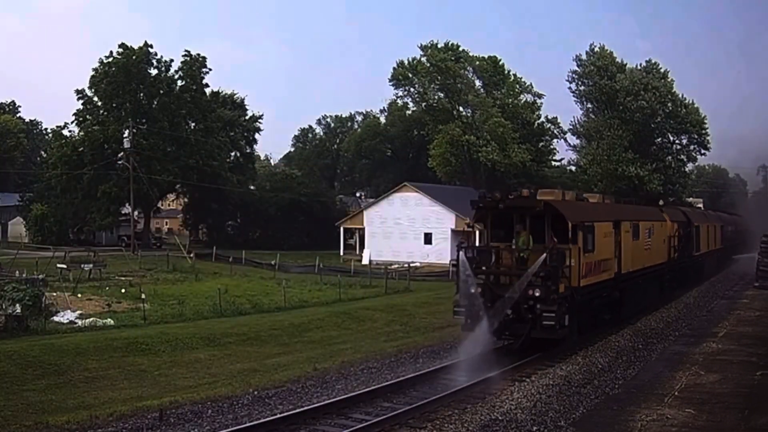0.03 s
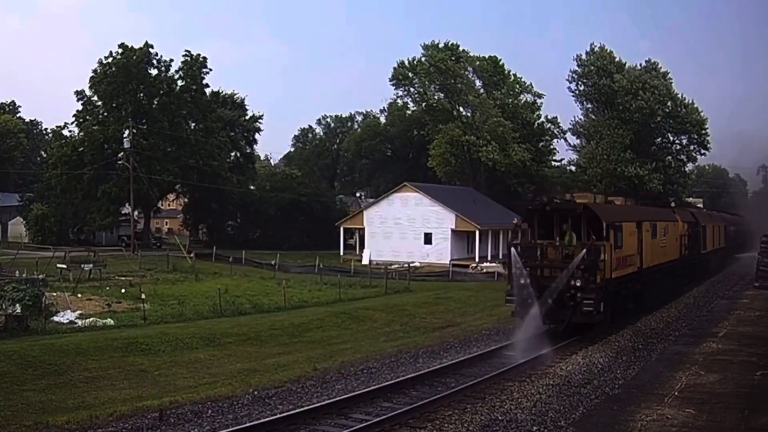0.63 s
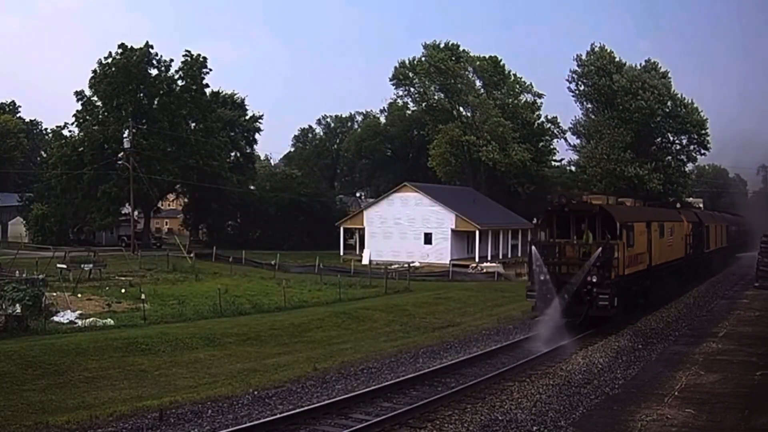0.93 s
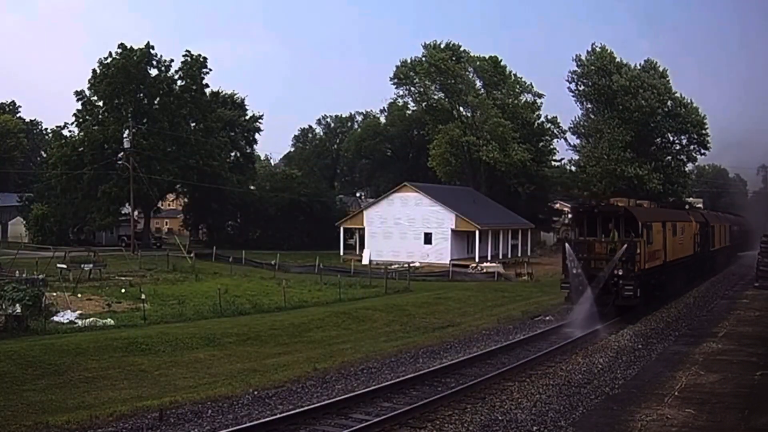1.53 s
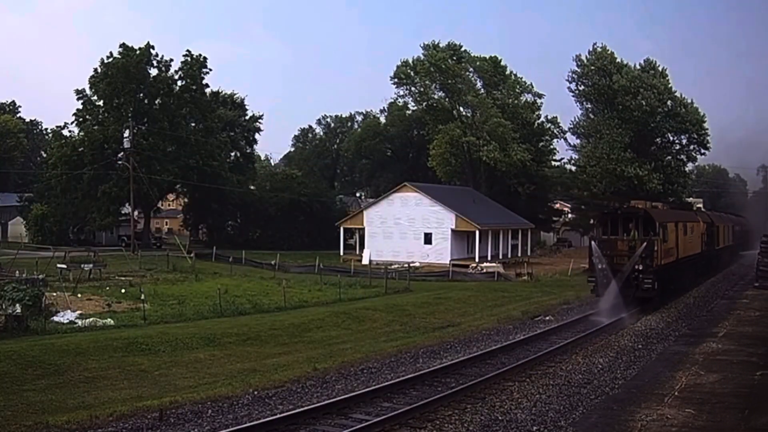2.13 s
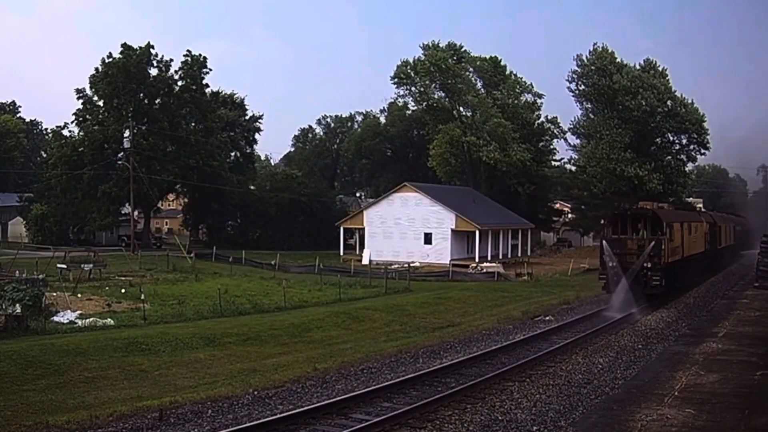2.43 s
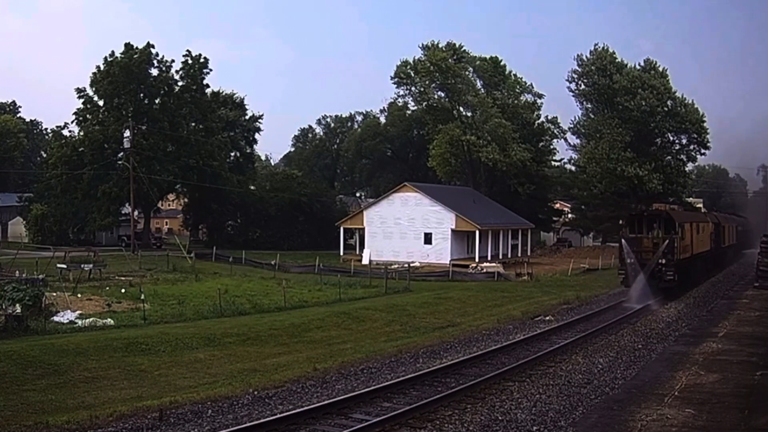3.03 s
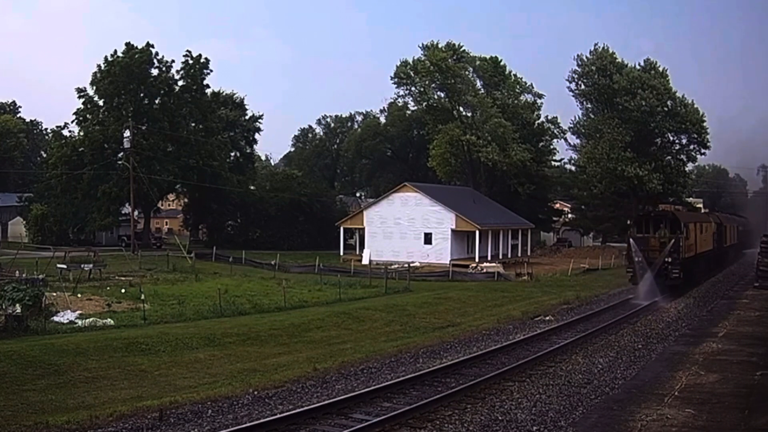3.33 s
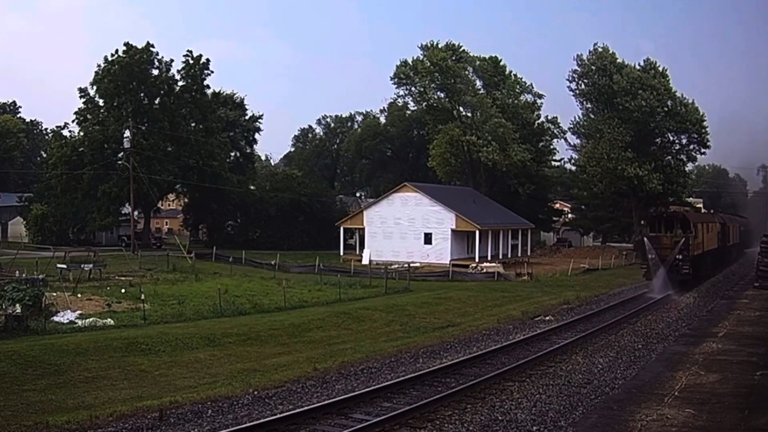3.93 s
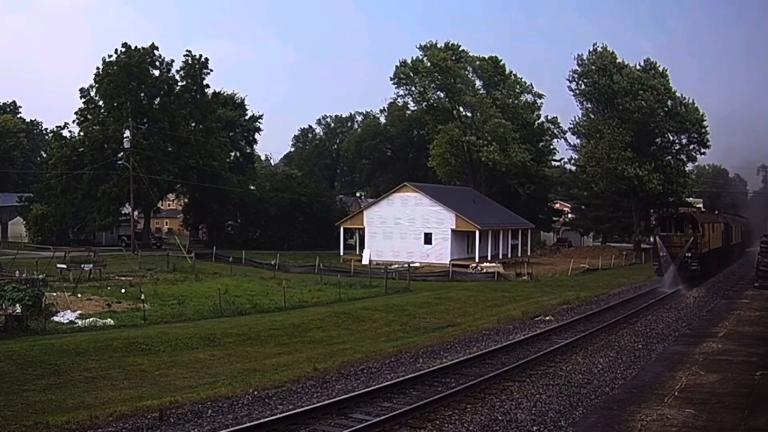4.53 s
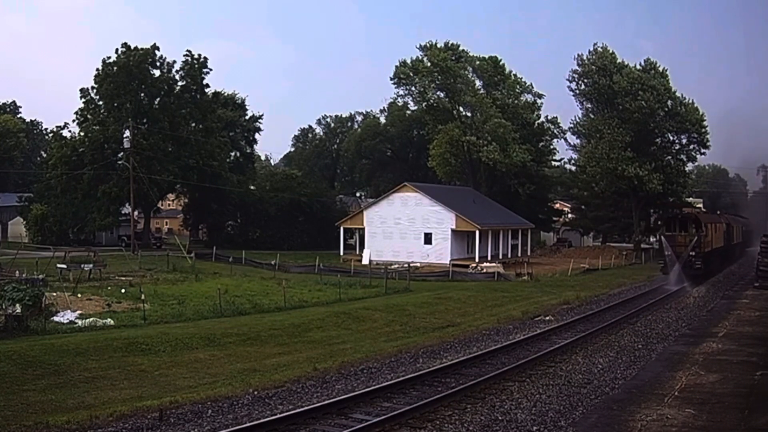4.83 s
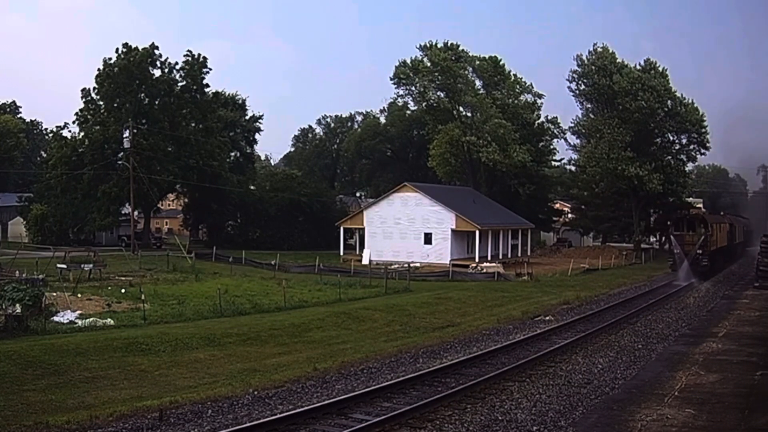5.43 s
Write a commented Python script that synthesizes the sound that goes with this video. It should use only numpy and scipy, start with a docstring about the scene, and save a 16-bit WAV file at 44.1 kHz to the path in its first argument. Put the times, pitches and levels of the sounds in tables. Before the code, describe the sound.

A rail grinding train moves away, its diesel engines droning under a machinery roar, with rasping stones and howling steel.

```python
"""A rail grinding train rolls away

Two diesel engines drone and throb under the roar of fans, motors and wheels.
Grinding stones rasp on the rail and make the steel sing and howl, while water jets hiss.
An echo off the ground adds a sweep that climbs as the train leaves; light wind nudges the microphone."""
import sys
import numpy as np
from scipy import signal
from scipy.fft import rfft, irfft
from scipy.io import wavfile
from scipy.ndimage import uniform_filter1d

SR = 44100
rng = np.random.default_rng(int(sys.argv[2]) if len(sys.argv) > 2 else 0)


def master(y):
    """Save y as 16-bit WAV."""
    cut = np.clip(np.atleast_2d(y).T, -1, 1)
    pcm = np.round(cut * 32767)  # scale
    wavfile.write(sys.argv[1], SR, pcm.astype(np.int16))


N = 250929
T = np.arange(N) / SR
HZ = np.fft.rfftfreq(N, 1 / SR)


def gain_of(db):
    """Turns decibels into a number to multiply a sound by."""
    return 10 ** (np.asarray(db) / 20)


def unit_level(x):
    """Scales a signal to an average (rms) level of 1."""
    return x / np.sqrt(np.mean(x ** 2) + 1e-20)


def curve(rows):
    """Joins (seconds, value) points with straight lines."""
    return np.interp(T, *np.transpose(rows))


def spectrum(points):
    """Joins (Hz, dB) points into a level for every frequency."""
    hz, db = np.transpose(points)
    return np.interp(np.log(HZ + 1), np.log(hz + 1), db)


def noise(shape_db):
    """Noise of level 1 with the given balance of low and high frequencies."""
    return unit_level(irfft(rfft(rng.standard_normal(N)) * gain_of(shape_db), N))


def wander(rate):
    """A random wobble of level 1 that changes up to about rate times a second."""
    times = np.linspace(0, N / SR, 2048)
    hz = np.fft.rfftfreq(len(times), times[1])
    slow = irfft(rfft(rng.standard_normal(len(times))) / (1 + (hz / rate) ** 4))
    return unit_level(np.interp(T, times, slow))


def distance(start_m=25.4, speed_m_per_s=3.5):
    """How many times farther away the train is than at the start."""
    return 1 + speed_m_per_s * T / start_m


def receding(db, falloff):
    """Turns a level in dB into a gain that drops with distance; a bigger falloff drops faster."""
    return gain_of(db) / distance() ** falloff


def engine_tone(turns, unsteady, rate=3):
    """One engine tone of level 1 whose strength and timing waver."""
    waver = 1 + unsteady * (wander(rate) + 1j * wander(rate))
    return unit_level((waver * np.exp(2j * np.pi * turns)).real)


# How fast the main engine runs. Each row: time in seconds, engine cycles per second.
ENGINE_SPEED = [(0, 14.775), (2.6, 14.77), (3.0, 14.73), (5.69, 14.735)]
# The drone of its firings. Each row: time in seconds, level in dB.
DRONE_LEVEL = [(0.12, -9), (0.69, -11.5), (2.62, -10), (2.98, -23), (3.3, -11.5), (3.54, -14.5),
               (3.69, -28), (3.8, -11.5), (4.26, -16.5), (5.11, -7.5), (5.55, -9)]
# The tone an octave above the drone. Each row: time in seconds, level in dB.
OCTAVE_LEVEL = [(0, -20), (.5, -20.5), (2.1, -25), (3, -28), (4.3, -31.5), (5.3, -24.5), (5.69, -24)]
# Low tones from unequal cylinders. Each row: multiple of the engine speed, level in dB.
THROB_TONES = [(2, -34), (3, -20), (5, -21.5), (6, -33), (7, -38)]
# Higher, buzzing tones. Each row: multiple of the engine speed, starting level in dB.
BUZZ_TONES = [(12, -31.5), (16, -40), (17, -39.5), (24, -28), (25, -34.5), (28, -37)]


def main_diesel(first_throb_s=.029, smear=.135, throb_follows=.25, buzz_fade_db_per_s=1.98):
    """Four firings a cycle make the drone; unequal cylinders add tones that beat with it as a throb."""
    speed = curve(ENGINE_SPEED)
    cycles = np.cumsum(speed) / SR - first_throb_s * speed[0]
    drone_db = curve(DRONE_LEVEL)

    def turns(multiple):
        # the exhaust pipe, tuned to the drone, spreads the other tones in time
        return multiple * cycles + smear * (multiple - 4) ** 2
    drone = gain_of(drone_db + .1) * engine_tone(turns(4), unsteady=.03)
    octave = gain_of(curve(OCTAVE_LEVEL) - .5) * engine_tone(turns(8), unsteady=.075)
    throb = sum(gain_of(db) * engine_tone(turns(k), unsteady=.11) for k, db in THROB_TONES)
    buzz = sum(gain_of(db) * engine_tone(turns(k), unsteady=.6) for k, db in BUZZ_TONES)
    throb *= gain_of(throb_follows * (drone_db - drone_db.mean()))
    return drone + octave + throb + buzz * gain_of(-buzz_fade_db_per_s * T)


# The hum of the second engine. Each row: pitch in Hz, starting level in dB.
HUM_TONES = [(41.1, -41), (103.4, -35), (112.3, -23), (132.6, -36), (351.3, -38)]


def second_diesel(fade_db_per_s=3.0):
    """An engine farther up the train hums out of tune with the first and fades."""
    hum = sum(gain_of(db) * engine_tone(hz * T + rng.random(), unsteady=.27, rate=7.3)
              for hz, db in HUM_TONES)
    return hum * gain_of(-fade_db_per_s * T)


# The exhaust's rumble. Each row: frequency in Hz, relative level in dB.
EXHAUST_SHAPE = [(20, -22), (40, 3.5), (65, 1.5), (90, 6), (120, 2.5), (135, -2.5), (155, -34), (300, -55)]


def exhaust():
    """Swirling exhaust gas makes a deep rumble."""
    return receding(db=-19.5, falloff=.7) * noise(spectrum(EXHAUST_SHAPE))


# The machinery's low body. Each row: frequency in Hz, relative level in dB.
BODY_SHAPE = [(90, -2.5), (150, -2), (250, 2), (340, -1), (430, -1), (550, -2), (680, -5.5), (1000, -13),
              (2000, -49)]
# Its higher roar. Each row: frequency in Hz, relative level in dB.
ROAR_SHAPE = [(350, -17), (600, -4), (720, 1.5), (950, 0), (1300, 2), (1500, -1), (1700, -6.5), (2000, -19),
              (3000, -55)]
# How loud that roar is. Each row: time in seconds, level in dB.
ROAR_LOUDNESS = [(0, -25), (2, -24), (3.8, -25.5), (5.1, -28), (5.69, -27)]


def machinery():
    """Fans, motors and wheels make a broad roar whose low body fades first."""
    body = receding(db=-20.5, falloff=1.51) * noise(spectrum(BODY_SHAPE))
    roar = gain_of(curve(ROAR_LOUDNESS) - .32) * noise(spectrum(ROAR_SHAPE))
    return body + roar


# The rasp of stone on rail. Each row: frequency in Hz, relative level in dB.
RASP_SHAPE = [(1200, -38), (1750, -5.5), (1950, -2.5), (2200, -2), (2600, -1), (3100, -1), (3500, -3),
              (4100, -11.5), (4500, -13.5), (5300, -21), (6600, -21.5), (7800, -29.5), (10000, -39),
              (15000, -56)]
# Where stones and rail ring. Each row: pitch in Hz, width in Hz, boost in dB.
RASP_RINGS = [(2395, 180, 3), (2810, 410, 4), (6096, 640, 10.5), (9430, 540, 13.5)]
# How hard the stones press. Each row: time in seconds, boost of the rasp in dB.
STONE_BITE = [(0, -0.8), (.6, 0.3), (2.2, -0.4), (3.15, 0.16), (4.45, 0.8), (5, -0.45), (5.35, 1.2),
              (5.69, 1.1)]


def grinding_stones(chatter_db=.43, bright_hz=3500, brightening=.73):
    """Stones rub the rail with a ringing rasp that grows louder and brighter as they bite."""
    ring_db = sum(db / (1 + (2 * (HZ - hz) / width) ** 2) for hz, width, db in RASP_RINGS)
    rasp = noise(spectrum(RASP_SHAPE) + ring_db)
    treble = irfft(rfft(rasp) * (1 - 1 / (1 + (HZ / bright_hz) ** 10)), N)
    bite_db = curve(STONE_BITE)
    level = receding(db=-19.5 + bite_db + chatter_db * wander(rate=91), falloff=.93)
    extra_treble = gain_of(.23 + brightening * bite_db) - 1
    return level * (rasp + extra_treble * treble)


def outdoor_air(sound, comb_hz=410, dull_hz=2400, flicker_db=1.58):
    """The ground adds an echo, dulled by rough gravel; moving air makes patches of the sound flicker."""
    hz, times, slices = signal.stft(sound, SR, nperseg=2048, noverlap=1536)
    hz = hz[:, None]
    # the echo makes a comb of peaks and dips, which spread as its detour shrinks with distance
    spacing_hz = comb_hz * np.interp(times, T, distance())
    # low sounds leave the whole train, so their echoes blur and make no comb
    echo = .24 * (1 - np.exp(-(hz / 550) ** 2)) / (1 + (hz / dull_hz) ** 2)
    # porous ground shifts the echo by a quarter of a wave (the 1j)
    slices *= 1 + 1j * echo * np.exp(-2j * np.pi * hz / spacing_hz)
    patches = uniform_filter1d(rng.standard_normal(slices.shape), size=3, axis=0)
    patches = uniform_filter1d(patches, size=16, axis=1)
    slices *= gain_of(flicker_db * unit_level(patches))
    return signal.istft(slices, SR, nperseg=2048, noverlap=1536)[1][:N]


def whistle(pitch_hz, width_hz):
    """Rubbing keeps a note sounding: a fuzzy whistle of level 1 that follows the given pitch."""
    lowpass = signal.butter(2, width_hz / 2, fs=SR, output="sos")
    a, b = signal.sosfilt(lowpass, rng.standard_normal((2, N)))
    turns = np.cumsum(pitch_hz) / SR
    return unit_level(((a + 1j * b) * np.exp(2j * np.pi * turns)).real)


# The steel's natural notes. Each row: pitch in Hz, width in Hz, base level in dB.
STEEL_NOTES = [(551, 48, -39), (808, 45, -43), (1048, 27, -51), (1276, 57, -37.5), (1558, 160, -36),
               (1977, 71, -46), (2347, 41, -39), (2455, 55, -38), (2846, 75, -33.5), (3064, 87, -38.5)]


def singing_steel(swell_db=1.5, rate=1.6, drift=.007):
    """All the notes of the rubbed steel sing softly, swelling and drifting by chance."""
    out = np.zeros(N)
    for hz, width, db in STEEL_NOTES:
        level = receding(db + swell_db * wander(rate), falloff=.98)
        out += level * whistle(hz * (1 + drift * wander(rate)), width)
    return out


# The loudest howls. Each row: start in seconds, end in seconds, rough pitch in Hz
# (the nearest steel note is played), slide in Hz per second, level in dB.
STONE_HOWLS = [(-.3, 0.81, 1282, 0, -31.5), (-.3, 1.4, 2350, 1, -30), (.1, 1.9, 1042, 10, -32.5),
               (.2, 2.9, 1990, 15, -34), (.65, 1.25, 1282, 0.5, -28), (.8, 1.84, 2860, 130.5, -27.5),
               (1.4, 2, 3070, 91, -31), (2.45, 4.1, 805, 9.5, -32), (2.55, 3.75, 2455, 50.5, -31),
               (2.9, 3.95, 1282, 15, -28), (3.95, 4.55, 2455, 199.5, -32), (4.15, 4.2, 2860, -60.5, -29)]


def howling_stones(waver=.004, surge_db=1.5, narrowing=.8):
    """A stone catches one note of the steel, which gets purer, swells in surges, slides and dies."""
    out = np.zeros(N)
    for start, end, rough_hz, slide, db in STONE_HOWLS:
        hz, width, _ = min(STEEL_NOTES, key=lambda note: abs(note[0] - rough_hz))
        pitch = hz * (1 + waver * wander(rate=7)) + slide * (T - (start + end) / 2)
        arch = np.sin(np.pi * np.clip((T - start) / (end - start), 0, 1))
        level = gain_of(db + surge_db * wander(rate=5)) * np.sqrt(arch)
        out += level * whistle(pitch, narrowing * width)
    return out


# The water's hiss. Each row: frequency in Hz, relative level in dB.
SPRAY_SHAPE = [(3500, -18), (6500, 8), (8000, -0.5), (10500, -0.5), (12500, -4.5), (14500, -6),
               (15700, -15)]


def water_spray(air_loss_db_per_s=1.45):
    """Water jets hiss on the gravel; the air swallows this high sound first as the train leaves."""
    return receding(db=-37.4 - air_loss_db_per_s * T, falloff=1) * noise(spectrum(SPRAY_SHAPE))


# The wind's low flutter. Each row: frequency in Hz, relative level in dB.
WIND_SHAPE = [(3, -12), (9, -8), (20, 16), (35, 17.5), (60, 12), (150, -55)]


def wind(breeze_db=-26, gust_db=-19, peak_s=3.6, rise_s=.22, fall_s=.75):
    """A breeze blows on the microphone; one gust rises quickly and dies slowly."""
    rise = np.clip(1 + (T - peak_s) / rise_s, 0, 1)
    fall = np.exp(-np.maximum(T - peak_s, 0) / fall_s)
    return (gain_of(breeze_db) + gain_of(gust_db) * rise * fall) * noise(spectrum(WIND_SHAPE))


def scene():
    """The whole train heard from beside the track, in one channel."""
    engines = main_diesel() + second_diesel() + exhaust()
    roar_and_rasp = outdoor_air(machinery() + grinding_stones())
    return (engines + roar_and_rasp + singing_steel() + howling_stones() + water_spray() + wind())[None]


def record(dry, knee=.82, top_hz=15720):
    """Rounds off peaks above the knee level, then cuts the highest treble."""
    excess = np.maximum(abs(dry) - knee, 0)
    rounded = np.clip(dry, -knee, knee) + np.sign(dry) * (1 - knee) * np.tanh(excess / (1 - knee))
    lowpass = signal.firwin(1023, top_hz, window=("kaiser", 9), fs=SR)
    return signal.oaconvolve(rounded, lowpass[None], "same")


dry = scene()
out = record(dry)
master(out)
```